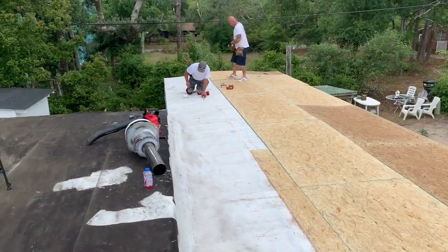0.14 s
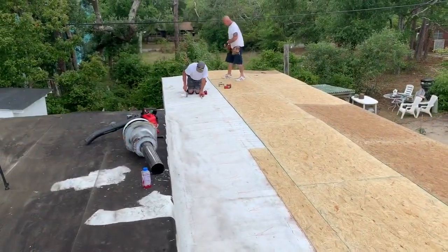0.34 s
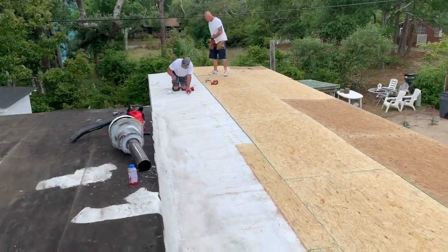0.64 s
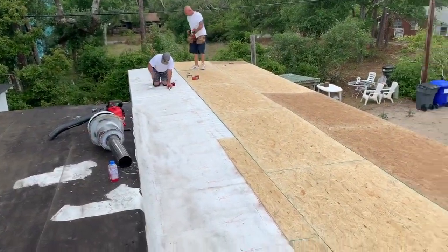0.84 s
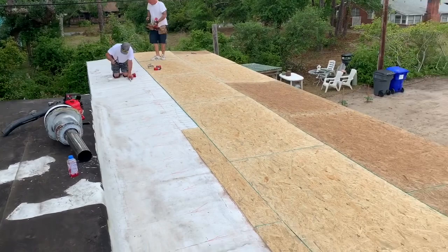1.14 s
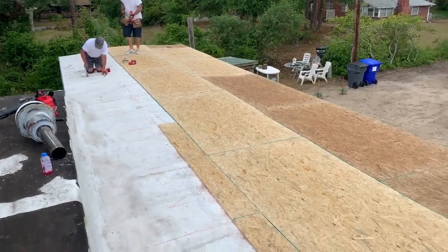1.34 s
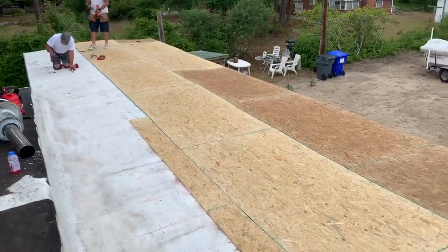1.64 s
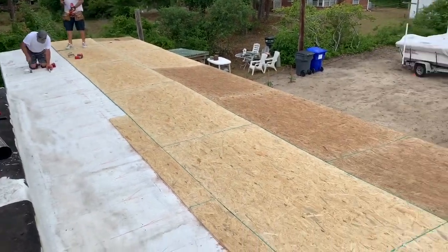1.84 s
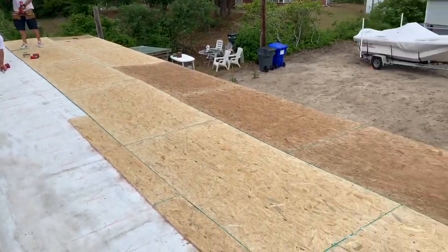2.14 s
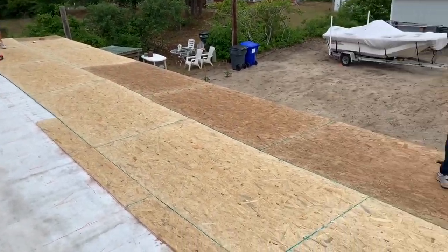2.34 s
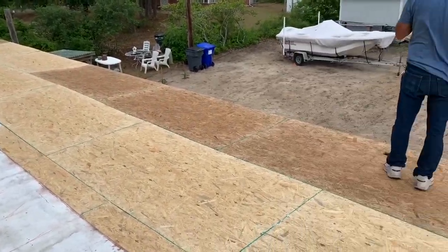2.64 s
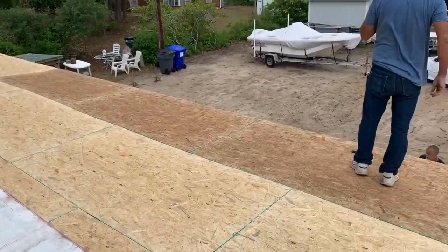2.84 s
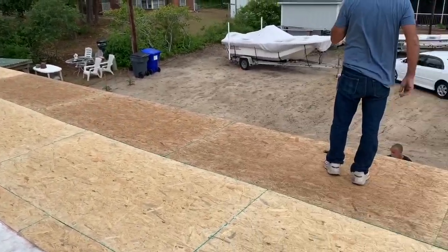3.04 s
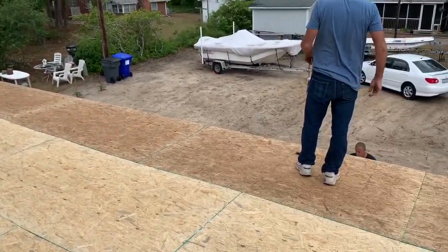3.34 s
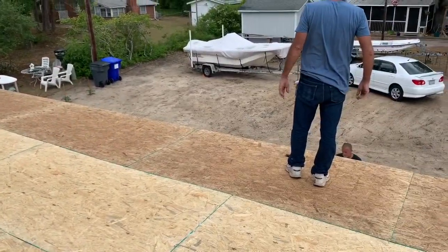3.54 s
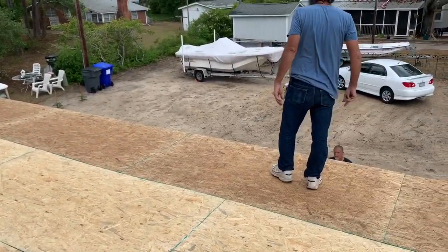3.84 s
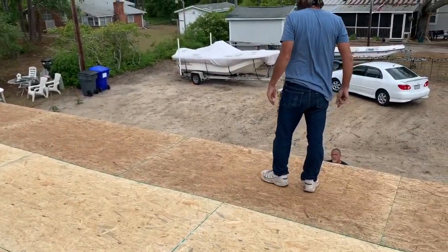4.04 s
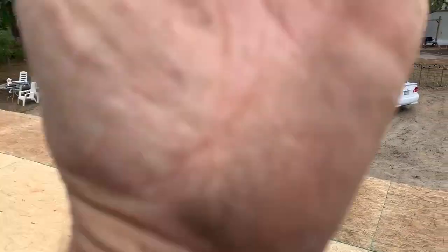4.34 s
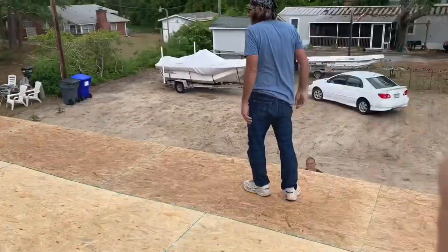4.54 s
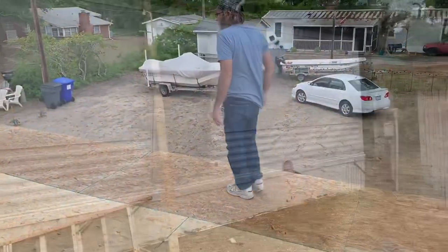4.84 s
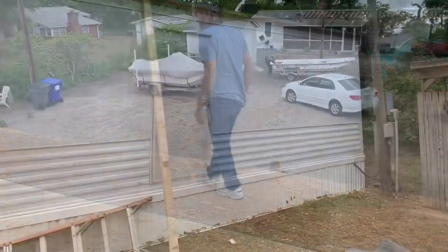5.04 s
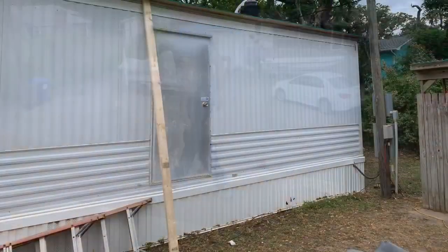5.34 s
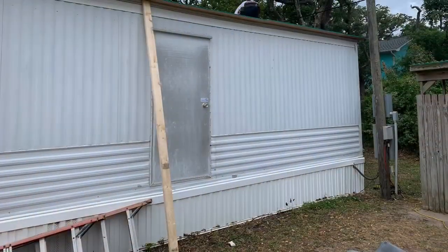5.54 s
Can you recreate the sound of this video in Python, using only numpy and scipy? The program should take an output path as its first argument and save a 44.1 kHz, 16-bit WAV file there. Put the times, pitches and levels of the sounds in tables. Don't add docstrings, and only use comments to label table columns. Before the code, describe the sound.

Hollow thumping knocks on thin wood sheathing, bright at first, then darker clacks quickening, over quiet yard air and rumble, fading at the end.

```python
import sys
import numpy as np
from scipy import signal
from scipy.fft import rfft, irfft, next_fast_len
from scipy.io import wavfile
from scipy.ndimage import uniform_filter1d, map_coordinates

SR = 44100
rng = np.random.default_rng(int(sys.argv[2]) if len(sys.argv) > 2 else 0)


def convert_level_to_amplitude(level_db):
    exponent = np.asarray(level_db, float) / 20
    return 10 ** exponent


def to_wav(s):
    ch = np.atleast_2d(s).T
    pcm = np.round(np.clip(ch, -1, 1) * 32767)
    wavfile.write(sys.argv[1], SR, pcm.astype(np.int16))


N = 251408

# (time [s], level [dB], low mode [Hz], high mode [Hz])
CLINKS = [(0.8459, -35.5, 1358, 5000), (1.274, -21, 1430, 3770), (1.6906, -19, 1387, 4660),
          (2.1533, -21.5, 1910, 3820), (2.5809, -16.5, 1820, 6670), (3.04, -24.5, 1920, 3595),
          (3.2246, -12, 1960, 3320), (3.488, -23, 2142, 3360), (3.5557, -16, 2360, 3070),
          (3.8771, -15.5, 1993, 3320), (4.0421, -26, 2130, 3930), (4.2244, -23.5, 2066, 3730),
          (4.541, -15.5, 2347, 3350), (4.8726, -17.5, 1870, 3530), (4.9236, -7, 2286, 3615),
          (5.2091, -23, 2470, 3270), (5.3582, -14, 2110, 5040)]
# (frequency [Hz], density [dB per Hz])
GRIT_SPECTRUM = [(1940, -35.5), (3300, -7.5), (3850, -9.5), (6920, -3), (7970, -3.5), (10100, -6.5),
                 (14800, -9), (16500, -19.5)]
# (time [s], level [dB])
SHAKING = [(0, -43.5), (.65, -44.5), (.95, -30.5), (1.1, -39.5), (1.4, -35.5), (1.7, -44.5), (2, -41.5),
           (2.2, -30), (2.35, -38), (2.56, -36), (3.1, -40), (3.27, -36), (3.5, -42.5), (4.25, -42.5),
           (4.44, -41), (4.55, -35), (4.9, -38.5), (5.4, -43)]
OUTDOOR_ALIKE = 0.65


def along(points, hz):
    f, v = np.transpose(points)
    return np.interp(np.log(hz + 1), np.log(f + 1), v)


def curves(rows):
    s, *columns = np.transpose(rows)
    return [np.interp(np.arange(N) / SR, s, column) for column in columns]


def unit(x):
    return x / np.sqrt(np.mean(x ** 2) + 1e-20)


def wobble(rate):
    knots = rng.standard_normal(int(N * rate / SR) + 4)
    return map_coordinates(knots, [np.arange(N) * rate / SR])


def filtered(x, response):
    m = next_fast_len(x.shape[-1] + 2048)
    return irfft(rfft(x, m) * response(np.fft.rfftfreq(m, 1 / SR)), m)[..., :x.shape[-1]]


def pair(spectrum, alike, size=N):
    common, *own = rng.standard_normal((3, size))
    share = np.clip(alike, 0, 1)
    noise = np.sqrt(share) * common + np.sqrt(1 - share) * np.array(own)
    return unit(filtered(noise, lambda hz: convert_level_to_amplitude(along(spectrum, hz))))


def patchy(x, depth_db):
    z = signal.stft(x, nperseg=512)[2]
    field = uniform_filter1d(rng.standard_normal(z.shape[1:]), 5, 0)
    field = uniform_filter1d(field, 8, 1)
    return signal.istft(z * convert_level_to_amplitude(depth_db * unit(field)), nperseg=512)[1][:, :x.shape[1]]


def dying(noise, t60s):
    hz, t, z = signal.stft(noise, SR, nperseg=256)
    decay = convert_level_to_amplitude(-60 * t / along(t60s, hz)[:, None])
    return signal.istft(z * decay, SR, nperseg=256)[1][..., :noise.shape[-1]]


def add(track, s, x):
    i = round(s * SR)
    track[:, i:i + x.shape[-1]] += x


def clumps():
    spacing_hz, depth_db = 350, 2.5
    knots = rng.standard_normal(round(SR / 2 / spacing_hz) + 4)
    return lambda hz: convert_level_to_amplitude(depth_db * map_coordinates(knots, [hz / spacing_hz]))


def bending_wave(thump_hz, ms, spread, below, above, size=SR // 2):
    u = np.fft.rfftfreq(size, 1 / SR) / thump_hz + 1e-6
    gain = np.exp(-(np.log(u) / np.where(u < 1, below, above)) ** 2)
    cycles = ms * thump_hz / 1000
    phase = np.pi - 2 * np.pi * cycles * ((u ** (1 - spread) - 1) / (1 - spread) + 1)
    phase -= 2 * np.pi * 0.16 * (u - 1)
    wave = irfft(gain * np.exp(1j * phase), size)
    return wave / np.abs(wave).max()


def knock(t):
    # (frequency [Hz], width [Hz], level [dB])
    panel_modes = [(397, 77, 1.5), (561, 120, -2), (796, 120, 3.5), (930, 55, -13.5), (1270, 160, -21)]
    rattle = rng.standard_normal(len(t)) * (t / 0.003) * np.exp(-t / 0.0035)
    strengths = convert_level_to_amplitude(1.3 * rng.standard_normal(len(panel_modes)))

    def panel(f):
        total = 0
        for strength, (centre, width, db) in zip(strengths, panel_modes):
            swing = 1j * f * width
            total = total + strength * convert_level_to_amplitude(db) * swing / (centre * centre - f * f + swing)
        return total

    sound = filtered(filtered(rattle, panel), lambda f: 1 / (1 + (f / 1700) ** 6))
    return sound / np.abs(sound).max()


def crack(t, air, crack_s, sheen, extra_db):
    burst = convert_level_to_amplitude(-60 * t / 0.041) * (1 - np.exp(-t / 0.0007)) / (1 + (t / crack_s) ** 4)
    rebound = convert_level_to_amplitude(-10.5 - 3 * rng.random()) * np.exp(-((t - 0.012) / 0.0005) ** 2)
    snap = np.exp(-t / 0.002) * (1 - np.exp(-t / 0.00018)) + sheen * rebound
    noise = filtered(pair(air, 0.88, size=len(t)), clumps())
    dull = filtered(noise, lambda f: 1 / (1 + (f / 5500) ** 4))
    return burst * dull + convert_level_to_amplitude(3.5) * snap * (noise - dull)


def yard_answer(t, yard_air, yard_s):
    # (frequency [Hz], T60 [s])
    yard_decay = [(1000, 0.14), (3000, 0.51), (7000, 0.42), (12000, 0.46)]
    scatter = patchy(pair(yard_air, 0.6, size=len(t)), 2.5)
    return (1 - np.exp(-(t / yard_s) ** 2)) * dying(scatter, yard_decay)


def deck_ring(t, ms):
    # (frequency [Hz], density [dB per Hz])
    deck_spectrum = [(24, -43), (40, -9.5), (96, -6.5), (222, -6), (460, -14), (632, -26), (692, -20),
                     (1040, -23), (1500, -44.5), (1950, -75), (3300, -120)]
    # (frequency [Hz], T60 [s])
    deck_decay = [(60, 0.35), (160, 0.25), (420, 0.15), (1100, 0.15)]
    swell = 1 - np.exp(-(t * 1000 / (ms + 5)) ** 3)
    return swell * dying(pair(deck_spectrum, 0.9, size=len(t)), deck_decay)


def blows(table, air, yard_air, sheen, crack_s, above, yard_db, yard_s):
    out, t = np.zeros((2, N + SR)), np.arange(SR // 3) / SR
    for s, crack_db, thump_db, knock_db, extra_db, hz, ms in table:
        answer = convert_level_to_amplitude(yard_db + (1 - sheen) * extra_db) * yard_answer(t, yard_air, yard_s)
        airborne = crack(t, air, crack_s, sheen, extra_db) + answer
        airborne = filtered(airborne, lambda f: convert_level_to_amplitude(sheen * extra_db / (1 + (6000 / (f + 1)) ** 4)))
        wave = bending_wave(hz, ms, 0.55, below=0.45, above=above, size=len(t))
        deck = wave + convert_level_to_amplitude(-9.5) * deck_ring(t, ms)
        add(out, s, convert_level_to_amplitude(crack_db - 3.5) * airborne)
        add(out, s, convert_level_to_amplitude(thump_db + 12.5) * deck)
        add(out, s, convert_level_to_amplitude(knock_db + 10.5) * knock(t))
        swell = convert_level_to_amplitude(crack_db - 26 - 60 * t[:900] / 0.06)[::-1]
        add(out, s - 900 / SR, swell * pair(yard_air, 0.6, size=900))
    return out[:, :N]


def bright_blows():
    # (time [s], crack [dB], thump [dB], knock [dB], sheen above 6 kHz [dB])
    bright = [
        (0.299, -49.5, -26, -39, 3),
        (0.847, -18.5, -12.5, -16.5, 2),
        (1.274, -18, -12.5, -21.5, 2.5),
        (1.6901, -17.5, -13.5, -22, 0),
        (2.1533, -18.5, -15, -19.5, 8),
        (2.5817, -17.5, -13.5, -22, 7),
        (3.041, -24.5, -15.5, -22.5, 2),
        (3.4885, -22.5, -14.5, -24.5, -2.5),
        (4.0406, -15, -17, -26, -5),
    ]
    # (frequency [Hz], density [dB per Hz])
    bright_air = [(710, -13.5), (1200, -3), (3800, -13.5), (5700, -15.5), (6710, -6), (8640, -16),
                  (10900, -15.5), (13500, -18), (15300, -19), (16500, -33.5)]
    # (frequency [Hz], density [dB per Hz])
    bright_yard = [(590, -35), (1000, 9), (1340, 1.5), (6530, -16.5), (8460, -11.5), (11300, -32),
                   (15600, -26.5), (16500, -38)]
    thump_hz, cycles = 165, 2.36
    rows = [(*row, thump_hz, 1000 * cycles / thump_hz) for row in bright]
    return blows(rows, bright_air, bright_yard, 1, crack_s=0.03, above=0.52, yard_db=-18.0, yard_s=0.0032)


def clack_rows(table, cycles, knock_db):
    first, fade_db_per_s = table[0][0], 6
    rows = []
    for s, crack_db, thump_db, yard_db, hz in table:
        panel_db = thump_db + knock_db - fade_db_per_s * (s - first)
        rows.append((s, crack_db, thump_db, panel_db, yard_db, hz, 1000 * cycles / hz))
    return rows


def clacking_blows():
    # (time [s], crack [dB], thump [dB], yard [dB], thump pitch [Hz])
    clack = [
        (3.2229, -7.5, -16, 1, 205),
        (3.5553, -9.5, -15, 1.5, 212),
        (3.8743, -22.5, -16.5, 7.5, 189.6),
    ]
    # (time [s], crack [dB], thump [dB], yard [dB], thump pitch [Hz])
    taps = [
        (4.2246, -22.5, -17, 4.5, 223),
        (4.541, -17.5, -17, 0, 280),
        (4.8712, -18, -17.5, 2, 300),
        (4.9228, -7.5, -19, -10.5, 141),
        (5.2086, -25.5, -20, -1, 350),
        (5.3566, -12.5, -18.5, -9, 170),
    ]
    # (frequency [Hz], density [dB per Hz])
    clack_air = [(710, -4.5), (1200, -1.5), (1940, -6.5), (3330, -11.5), (4330, -19), (5050, -15.5),
                 (8550, -22), (10300, -34.5), (15100, -34.5), (16500, -55)]
    # (frequency [Hz], density [dB per Hz])
    clack_yard = [(590, -34.5), (1000, 11.5), (1490, -6.5), (5110, -20), (7970, -26.5), (8760, -49.5),
                  (9960, -38), (15600, -54.5), (16500, -96.5)]
    rows = clack_rows(clack, cycles=2.27, knock_db=-3) + clack_rows(taps, cycles=1.5, knock_db=-1.5)
    return blows(rows, clack_air, clack_yard, 0, crack_s=0.0088, above=0.42, yard_db=-9.5, yard_s=0.024)


def clinks():
    out, t = np.zeros((2, N)), np.arange(SR // 20) / SR
    shape = convert_level_to_amplitude(-60 * t / 0.014) * (1 - np.exp(-t / 0.00069))
    for s, db, low_hz, high_hz in CLINKS:
        drift = np.cumsum(rng.standard_normal((2, len(t))), axis=1) * 0.065
        low, high = np.sin(2 * np.pi * np.outer([low_hz, high_hz], t) + drift)
        add(out, s, convert_level_to_amplitude(db + 1.5) * (shape * (low + convert_level_to_amplitude(-5.0) * high))[None])
    return out


def footfalls():
    # (time [s], level [dB], pitch [Hz], tap [dB])
    steps = [(0.326, -23, 100, -11), (0.76, -21.5, 59.2, -8.5), (0.798, -18, 94.2, -23),
             (0.924, -10.5, 102, -17), (1, -14.5, 64.6, -20.5), (1.053, -13, 61.9, -20.5),
             (1.087, -29.5, 75.4, -18), (1.44, -18, 61.9, -11.5), (1.471, -19, 96.9, -12),
             (1.93, -26, 118, -15.5), (2.015, -37, 61.9, 8.5), (2.099, -27.5, 102, -17),
             (2.278, -21.5, 102, -13.5), (2.48, -33.5, 45.8, -11.5), (2.5, -23, 45.8, -16.5),
             (2.806, -34.5, 207, -11.5), (2.845, -13, 88.8, -12.5), (2.949, -18, 88.8, -15.5),
             (4.391, -35, 91.5, -6), (4.462, -28.5, 78.1, -6), (4.703, -23.5, 80.7, -8),
             (4.564, -29, 90, -23), (4.959, -20.5, 68.4, -5.5)]
    puff_spectrum = [(100, -34.5), (200, 15.5), (450, -0.5), (900, -50.5)]  # (Hz, dB per Hz)
    out, t = np.zeros((2, N + SR)), np.arange(SR // 3) / SR
    for s, db, hz, tap_db in steps:
        push = np.sin(2 * np.pi * hz * t) * (1 - np.exp(-(t / 0.0042) ** 2))
        push *= convert_level_to_amplitude(-60 * t / (13.5 / hz))
        tap = bending_wave(230, 9, 0.8, below=0.6, above=0.55, size=len(t)) * convert_level_to_amplitude(tap_db)
        puff_shape = convert_level_to_amplitude(tap_db - 5.5 - 60 * t / 0.093) * (1 - np.exp(-t / 0.0051))
        puff = pair(puff_spectrum, 0.94, size=len(t)) * puff_shape
        add(out, s, convert_level_to_amplitude(db + 2) * (push + tap + puff))
    return out[:, :N]


def scuffs():
    # (time [s], level [dB], length [s])
    drags = [(0.456, -56, .07), (1, -60.5, 0.083), (1.526, -49, 0.028), (1.567, -59.5, .05),
             (3.203, -63, 0.012), (4.48, -32.5, 0.0059), (4.49, -59, 0.039), (5.234, -41, 0.0066),
             (1.177, -58.5, .004), (0.236, -68, .004), (0.565, -58, .004), (0.623, -61, .005)]
    out, grain = np.zeros((2, N)), unit(convert_level_to_amplitude(6 * wobble(900)))
    for s, db, length in drags:
        n = max(round(0.89 * length * SR), 16)
        shape = np.sin(np.pi * np.linspace(0, 1, n) ** 0.43) ** 2
        add(out, s, convert_level_to_amplitude(db) * shape * pair(GRIT_SPECTRUM, 0.6, size=n))
    return out * grain


def snaps():
    # (time [s], level [dB])
    stones = [
        (1.5135, -55),
        (1.5288, -41),
        (1.5345, -39),
        (1.537, -40),
        (1.5401, -36),
        (1.5426, -35),
        (1.5449, -42),
        (1.5538, -44),
    ]
    out, t = np.zeros((2, N)), np.arange(SR // 100) / SR
    for s, db in stones:
        hz = 3900 * (1 + 0.047 * rng.standard_normal())
        ring = convert_level_to_amplitude(-6) * np.sin(2 * np.pi * hz * t)
        shape = convert_level_to_amplitude(db - 60 * t / 0.0087) * (1 - np.exp(-t / 0.0003))
        add(out, s, shape * (pair(GRIT_SPECTRUM, 0.43, size=len(t)) + ring) * 2)
    return out


def creaks():
    # (time [s], length [s], pitch [Hz], level [dB])
    groans = [
        (2.015, 0.047, 200, -41.5),
        (2.06, .07, 350, -40.5),
        (2.5, .04, 1350, -53),
        (1.465, 0.042, 300, -40),
    ]
    out = np.zeros((2, N))
    for s, length, hz, db in groans:
        n = round(length * SR)
        band = [(0.4 * hz, -120), (0.75 * hz, -25), (hz, 0), (1.25 * hz, -25), (2 * hz, -120)]
        add(out, s, convert_level_to_amplitude(db) * np.hanning(n) * pair(band, 0.9, size=n))
    return out


def shaking():
    level_db, = curves(SHAKING)
    return level_db, level_db - level_db.mean()


def rumble():
    # (frequency [Hz], density [dB per Hz])
    rumble_spectrum = [(12, -43), (20, -3), (59, -3.5), (97, -7.5), (211, -16), (300, -27.5), (390, -56.5),
                       (660, -120)]
    level_db, _ = shaking()
    return convert_level_to_amplitude(level_db + 4.0 + 3 * wobble(16)) * pair(rumble_spectrum, 0.99)


def open_air():
    # (frequency [Hz], density [dB per Hz])
    air_spectrum = [(100, -38), (200, 3.5), (550, -7), (800, -7), (2000, -15), (3200, -28), (4500, -56)]
    _, swing_db = shaking()
    level_db = -50 + 0.16 * swing_db
    return convert_level_to_amplitude(level_db + 2.5 + 1.3 * wobble(16)) * patchy(pair(air_spectrum, OUTDOOR_ALIKE), depth_db=2.5)


def leaves():
    # (frequency [Hz], density [dB per Hz])
    leaf_spectrum = [(2000, -31), (3500, 4.5), (5000, -3.5), (7000, -4.5), (12000, -25), (16500, -24.5)]
    _, swing_db = shaking()
    t = np.arange(N) / SR
    since_blow = np.min([np.where(t > s, t - s, np.inf) for s, *_ in CLINKS], axis=0)
    duck_db = -17.5 * np.exp(-(since_blow / 0.17) ** 2)
    level_db = -64 + 0.1 * swing_db + duck_db
    return convert_level_to_amplitude(level_db - 3.0) * patchy(pair(leaf_spectrum, OUTDOOR_ALIKE), depth_db=1.0)


def insects():
    # (frequency [Hz], density [dB per Hz])
    insect_spectrum = [(1900, -30.5), (2300, -4), (2600, 2.5), (2780, -6.5), (3100, -32.5)]
    # (time [s], level [dB])
    facing = [(0, -59.5), (.6, -57), (1, -52), (1.7, -57.5), (2.1, -59.5), (2.5, -60), (2.9, -67.5),
              (3.4, -64), (4.6, -62), (5.4, -67.5)]
    level_db, = curves(facing)
    return convert_level_to_amplitude(level_db - 2.5 + 2.4 * wobble(60)) * pair(insect_spectrum, OUTDOOR_ALIKE)


def bird():
    # (start [s], end [s], pitch [Hz], level [dB])
    chirps = [
        (0, .035, 4120, -55),
        (.13, .185, 4390, -58),
        (1.484, 1.498, 11300, -62),
    ]
    out = np.zeros((2, N))
    for start, stop, hz, db in chirps:
        n = round((stop - start) * SR)
        band = [(hz - 250, -60), (hz, 0), (hz + 250, -60)]
        add(out, start, convert_level_to_amplitude(db) * np.hanning(n) * pair(band, 1, size=n))
    return out


def scene():
    hammering = bright_blows() + clacking_blows() + clinks()
    workers = footfalls() + scuffs() + snaps() + creaks()
    outdoors = rumble() + open_air() + leaves() + insects() + bird()
    return hammering + workers + outdoors


def shaded(bass):
    # (time [s], closed [0-1], cavity pitch [Hz], width [Hz])
    hand = [
        (3.1, 0, 270, 90),
        (3.9, .45, 235, 70),
        (4.02, 1, 220, 40),
        (4.25, 1, 230, 110),
        (4.55, 1, 175, 120),
        (4.86, 1, 215, 220),
    ]
    hz, t, z = signal.stft(bass, SR, nperseg=4096, noverlap=3584)
    closed, centre, width = (np.interp(t, np.arange(N) / SR, c) for c in curves(hand))
    swing = 1j * hz[:, None] * np.abs(width)
    turn = 1 - 2 * np.clip(closed, 0, 1) * swing / (centre ** 2 - hz[:, None] ** 2 + swing)
    return signal.istft(z * turn, SR, nperseg=4096, noverlap=3584)[1][:N]


def late(x, ms):
    return map_coordinates(x, [np.arange(N) - ms * SR / 1000], order=3)


def low_pass(x):
    return signal.sosfilt(signal.butter(12, 17010, fs=SR, output="sos"), x)


def record(dry):
    # (time [s], delay [ms])
    lag = [(0, .36), (.7, .36), (.84, .2), (2.2, .27), (2.6, .36), (3.2, .42), (3.9, .39), (4.8, .46),
           (5.7, .46)]
    # (frequency [Hz], gain [dB])
    tilt = [(480, 0), (780, -4), (1300, .5), (2200, 1.5), (4200, 4), (7000, 0)]
    left, right = dry

    def below(top):
        return lambda hz: 1 / (1 + (hz / top) ** 8)

    def treble(hz):
        return 1 / (1 + (7000 / (hz + 1)) ** 16)

    def middle_band(hz):
        return (1 - below(380)(hz) - treble(hz)) * convert_level_to_amplitude(along(tilt, hz))

    shared = shaded(filtered(left, below(440)))
    shared += late(filtered(0.8 * left + 0.27 * right, treble), -0.183)
    middle = late(filtered(right, middle_band), *curves(lag))
    both = np.array([left, shared + middle])
    both = filtered(both, lambda hz: 1 / (1 + (hz / 16200) ** 40) / (1 + (33 / (hz + 1)) ** 4))
    both = both / (1 + np.abs(both / 0.96) ** 8) ** (1 / 8)
    end_s, fade_s = 5.412, 1
    fade = np.clip((end_s - np.arange(N) / SR) / fade_s, 0, 1)
    return low_pass(both * fade)


dry = scene()
out = record(dry)
to_wav(out)
```